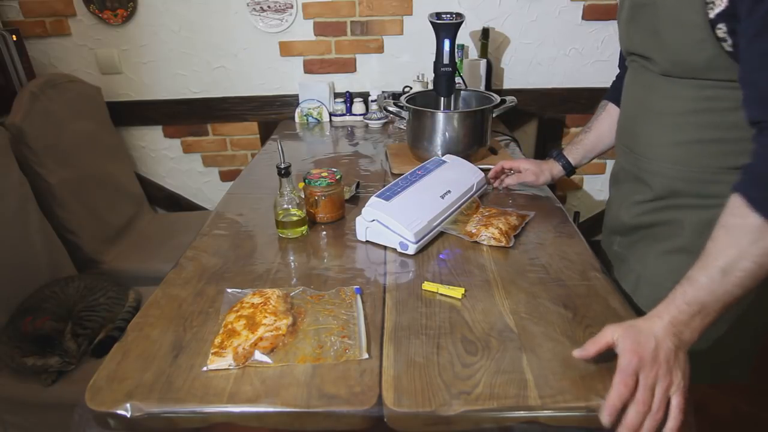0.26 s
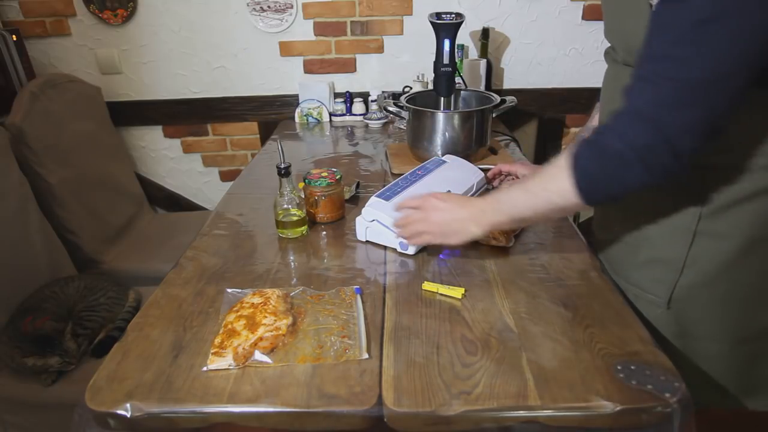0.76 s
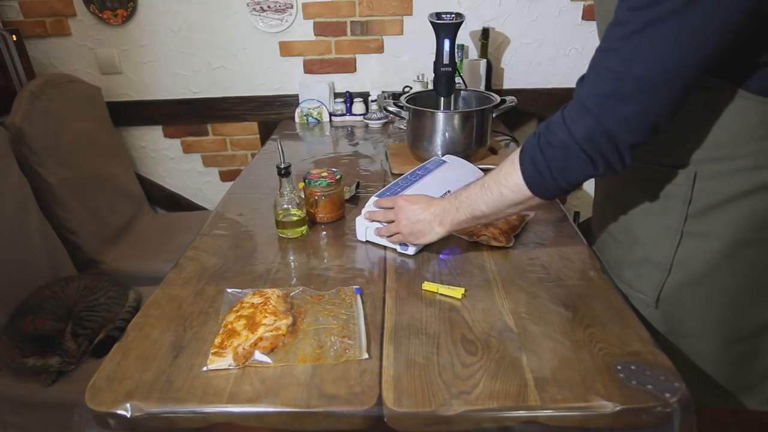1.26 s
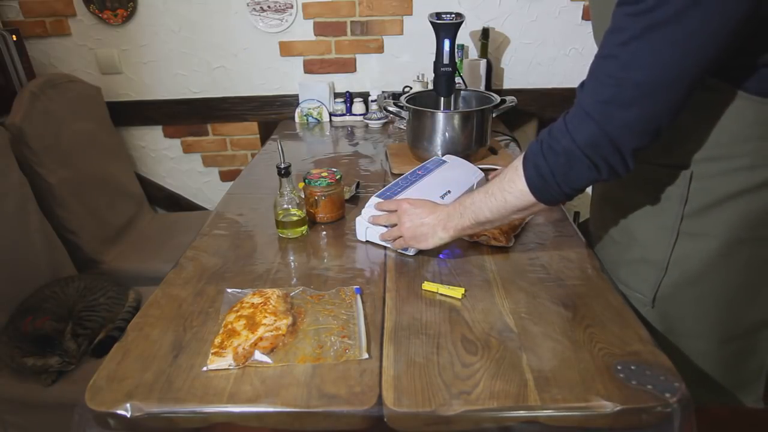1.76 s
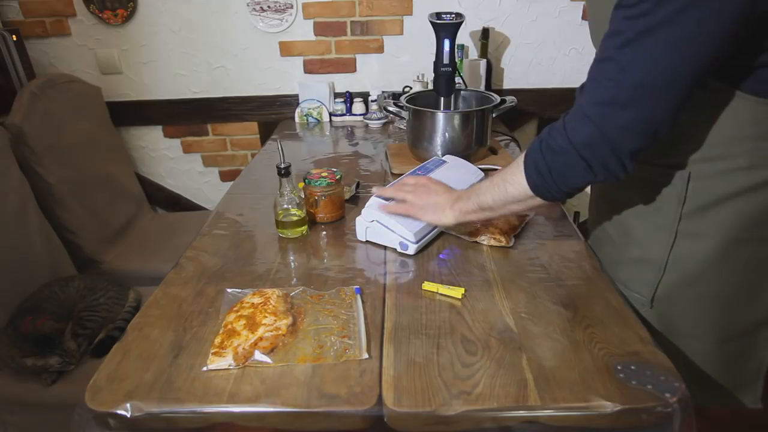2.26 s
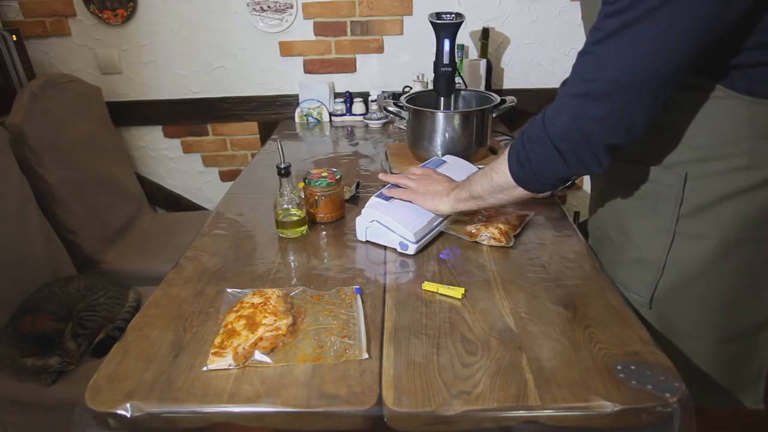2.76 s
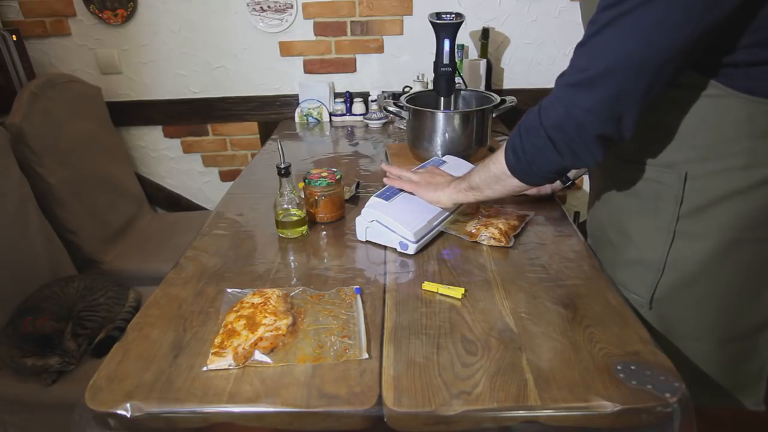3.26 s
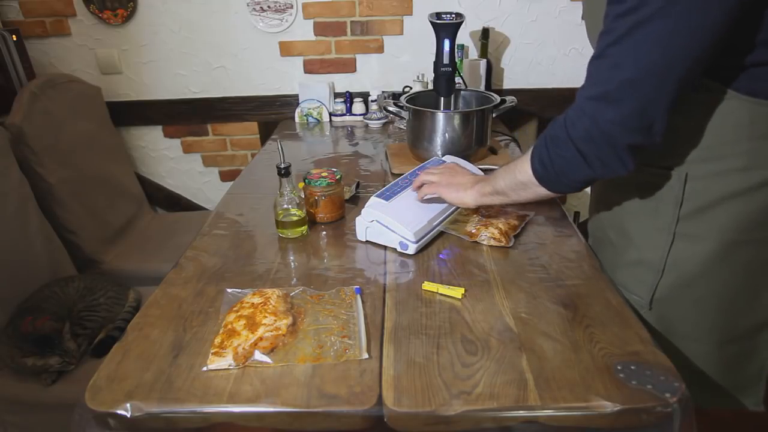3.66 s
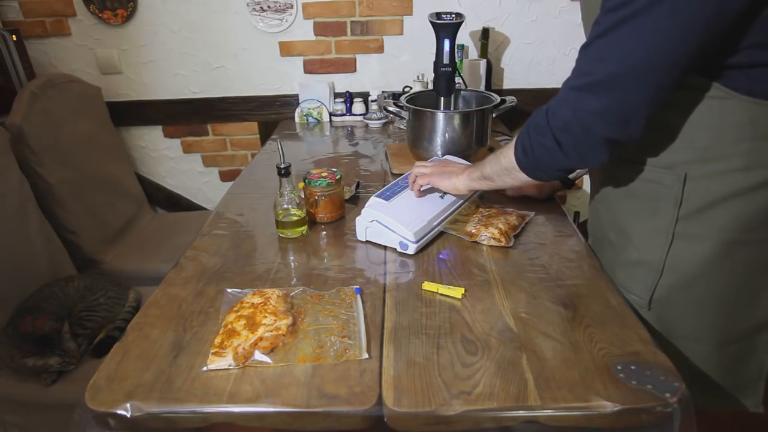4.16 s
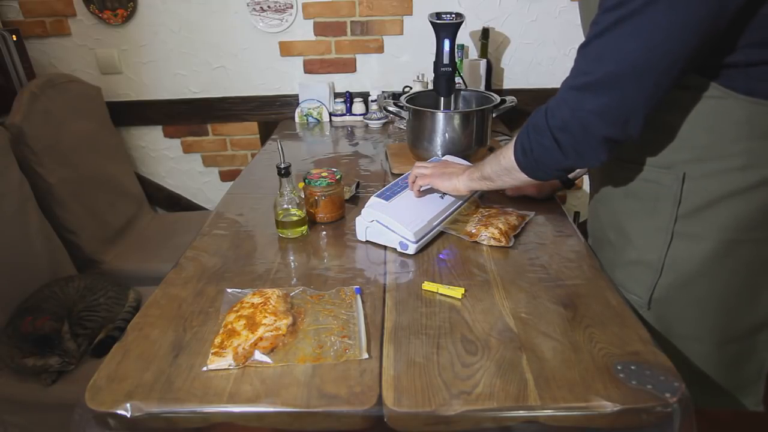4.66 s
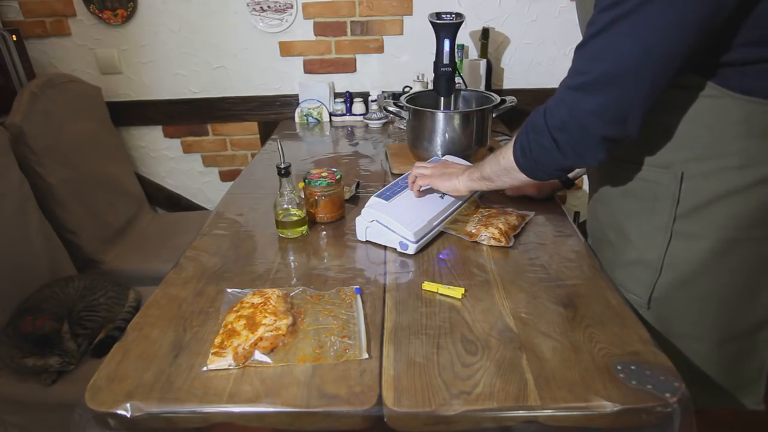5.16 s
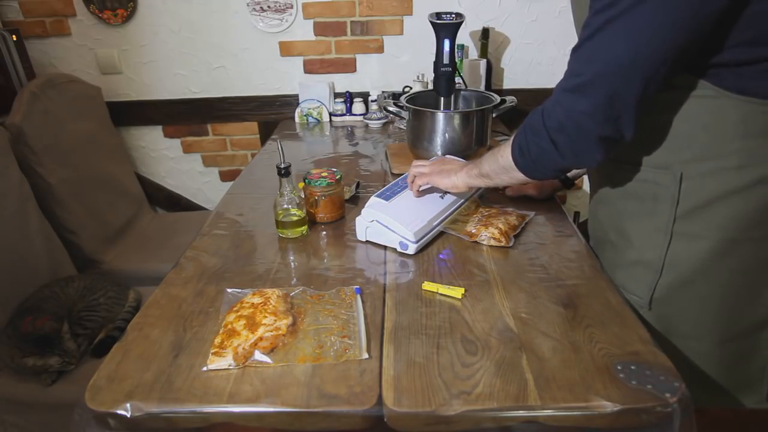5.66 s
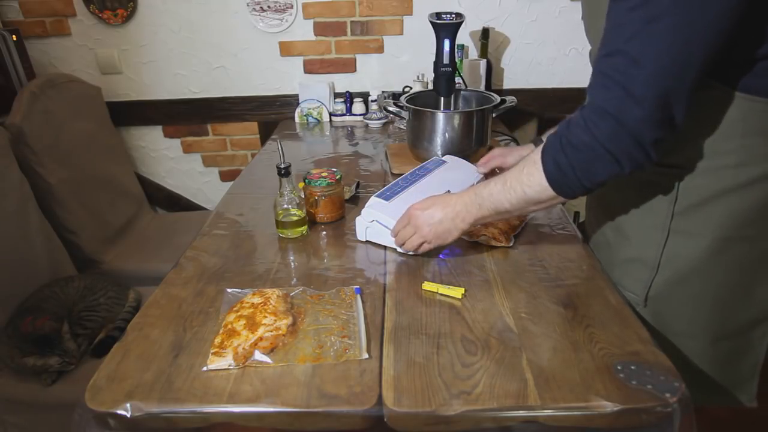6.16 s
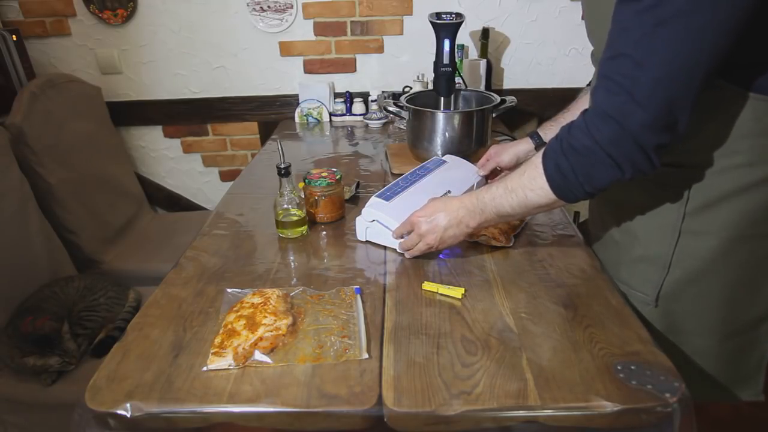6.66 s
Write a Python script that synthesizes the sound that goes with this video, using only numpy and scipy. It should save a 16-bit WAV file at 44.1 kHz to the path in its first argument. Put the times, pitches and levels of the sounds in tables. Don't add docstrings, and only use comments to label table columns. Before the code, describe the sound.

Harsh motor drone of a countertop bag sealer, a hard lid snap at three seconds, abrupt stop, then loud plastic unlatching clacks in a kitchen.

```python
import sys
import numpy as np
from scipy import signal
from scipy.fft import rfft, irfft
from scipy.io import wavfile
from scipy.ndimage import uniform_filter1d, minimum_filter1d

SR = 44100
rng = np.random.default_rng(int(sys.argv[2]) if len(sys.argv) > 2 else 0)


def dump_mix(stems):
    frames = np.atleast_2d(stems).T
    limited = np.clip(frames, -1, 1)
    pcm = np.round(limited * 32767).astype(np.int16)
    wavfile.write(sys.argv[1], SR, pcm)


def linear_from_db(decibels):
    return 10 ** (np.asarray(decibels, float) / 20)


N = 303849

STOP_S, COAST_S = 5.331, .024
BACKGROUND_DB, RISE_DB_PER_S = -40, 4
LIMIT_DB, ATTACK_S, HOLD_S, RELEASE_DB_PER_S = -2.5, 0.0061, 0.082, 19.5
FADE_S, FADE_DB_PER_S = 6.77, 42
LID_LAG = 0.1269
TABLE_NULL_HZ, TABLE_NULL_WIDTH_HZ, TABLE_NULL_SHARE = 412, 24, .8
CLAMP_AT, CLAMP_DB = .44, .9

# [f/Hz, level/dB]
ROOM_TONE = [(20, -52), (45, -40), (70, -29), (95, -13.5), (200, -3), (450, -8), (620, -10.5), (1100, -15),
             (2500, -20.5), (6400, -25.5), (8000, -33.5), (10800, -44.5), (16000, -49)]
# [f/Hz, width/Hz, level/dB]
CIRCULATOR = [(159, 37, -11.5), (220.2, 21, -11), (289, 8.4, -12), (346.6, 12.6, -10.5), (443.7, 30, -6),
              (699, 15, -16), (990, 18, -20)]
# [f/Hz, level/dB]
TONES = [
    (100, -14),
    (441.4, -10),
]
# [f/Hz, t60/s]
KITCHEN = [(100, 0.15), (1000, 0.43), (4000, 0.32), (12000, 0.15)]
# [t/s, stroke rate/Hz]
SPEED = [(0, 47.49), (.3, 47.22), (.55, 47.18), (1.05, 46.84), (1.3, 46.69), (1.72, 46.26), (2.08, 45.85),
         (2.35, 45.59), (2.65, 45.37), (2.85, 45.09), (3.15, 45.1), (3.45, 45.39), (3.8, 45.58),
         (4.25, 45.69), (4.6, 45.66), (5.33, 45.59)]
# [t/s, state, buzz of the top panel/dB]; states 0 resting, 1 loose, 2 drawn in,
# 3 sucked down, 4 held at a corner, 5 slipping, 6 pressed by hand, 7 settling, 8 latched
SEATING = [(0, 0.5, 3.5), (.35, 0.26, 0.5), (.65, 1, 2), (.92, 2.05, .5), (1.08, 2, 0.5), (1.3, 2.5, 1),
           (1.6, 3, 0.5), (2.1, 3, -5.5), (2.3, 3.5, -3), (2.52, 4, -2.5), (2.64, 4.5, -4.5),
           (2.76, 4.5, -13), (2.86, 5.5, -3), (3.1, 6.5, 3.5), (3.16, 6.5, 3), (3.4, 6.5, 4.5),
           (3.65, 7, 6.5), (3.95, 7.5, 4), (4.5, 7.5, 2), (5.3, 9.5, 3.5)]
# [f/Hz, width/Hz, level/dB]
RESTING = [(141, 43, -18), (338, 25, -6.5), (509, 20, -3), (640, 23, -14), (697, 18, -5.5), (800, 13, -7.5),
           (990, 42, -15), (1370, 110, -17.5), (1520, 60, -14.5), (1810, 49, -16), (1960, 26, -11),
           (2120, 97, -20), (2420, 60, -19), (2700, 120, -28)]
LOOSE = [(140, 25, -17.5), (349, 34, -7), (521, 19, -7.5), (711, 33, -7), (785, 44, -6), (987, 14, -13.5),
         (1083, 10, -10), (1225, 13, -10.5), (1630, 80, -19), (1940, 42, -12), (2010, 18, -12),
         (2072, 18, -12), (2470, 130, -21), (2700, 100, -20)]
DRAWN = [(151, 37, -12), (341.5, 26, -5), (580, 29, -11), (660, 49, -18), (752, 48, -10.5),
         (940, 78, -12.5), (1080, 68, -14), (1217, 18, -11), (1286, 16, -5.5), (1600, 44, -18),
         (1730, 22, -14), (1892, 25, -8.5), (1965, 18, -10), (2400, 300, -20.5)]
SUCKED = [(170.7, 17, -4), (316, 16.5, 1.5), (331, 58, -5), (495, 19, -5.5), (573, 170, -10.5),
          (693, 280, -12), (820, 46, -7), (980, 47, -40), (1120, 25, -11.5), (1223, 20, -9), (1330, 19, -9),
          (1740, 100, -21), (1920, 24, -5), (2100, 460, -20)]
HELD = [(158.4, 18.5, -6.5), (356, 19, -3), (517, 13, -8), (692, 9.4, -3), (872, 15, -12.5), (987, 19, -12),
        (1080, 24, -15), (1270, 67, -16), (1565, 26, -16), (1698, 22, -10), (1887, 30, -4),
        (2050, 199, -15), (2280, 39, -10.5), (2680, 282, -20)]
SLIPPING = [(172, 24, -8.5), (349, 18, -2.5), (502, 25, -15), (575, 35, -6.5), (660, 60, -19),
            (810, 34, -10), (940, 69, -20), (1280, 45, -12), (1343, 41, -19), (1650, 64, -18),
            (1870, 40, -14), (1910, 58, -8.5), (2084, 20, -5), (2330, 200, -16)]
PRESSED = [(200, 30, -0.5), (340, 40, -4.5), (450, 14, -10), (607, 53, -2), (822, 14, -8), (900, 16, -19),
           (1085, 24, -11), (1172, 14, -10), (1308, 34, -8), (1597, 18, -4.5), (1740, 40, -5),
           (1900, 48, -1), (2075, 12, -0.5), (2380, 65, -13), (2570, 34, -19)]
SETTLING = [(191, 25, -8), (331, 22, -9), (528, 41, -11), (688, 21, -8), (910, 36, -11.5),
            (1152, 42, -10.5), (1244, 50, -11), (1365, 23, -12), (1600, 57, -17), (1688, 7.4, -8),
            (1826, 27, -16), (1910, 21, -8.5), (1950, 70, -11.5), (2092, 21, -8.5), (2260, 130, -17.5),
            (2550, 47, -20), (2750, 130, -19.5)]
LATCHED = [(190, 19, -6.5), (338, 25, -4.5), (560, 79, -5), (685, 27, -8), (808, 51, -7), (1141, 18, -14),
           (1232, 21, -14.5), (1324, 14, -6.5), (1574, 33, -5), (1690, 16, -17), (1902, 71, -4),
           (2035, 200, -14.5), (2388, 45, -7), (2560, 81, -14.5), (2630, 190, -13.5)]
SMEAR = [0.62, 0.94, 1, 1, 0.57, 0.63, 0.53, 0.57, 0.47]
BASE_LAG = [0, 0, 0, 0, 0, 0, .02, .08, .11]
FIRST_STRIKE = [0, 0, 0, 0, .3, .3, .9, .8, .4]
# [case hum/dB, air re hum/dB, valve knock/dB, valve rattle/dB]
LEVELS = [
    (-26.5, -20, -28.5, -23.5),
    (-25, -11, -30, -24),
    (-26, -14, -29, -23.5),
    (-23.5, -16, -29, -24.5),
    (-20, -23, -29.5, -27),
    (-21.5, -13, -30, -27),
    (-19.5, -17, -30, -28),
    (-24, -20, -35, -32),
    (-21.5, -53, -31, -31.5),
]
# [f/Hz, level/dB]
AIR = [(41, -51), (70, -55), (135, 4), (268, -14), (326, -12), (607, 0), (727, -8), (1450, -1), (1910, 1),
       (3500, -8.5), (4550, -28), (7700, -120)]
# [t/s, lead/strokes]
VALVE_LEAD = [
    (0, 0.072),
    (2.1, 0.084),
    (3.6, 0.00072),
]
# [f/Hz, level/dB]
KNOCK = [(1590, -5.5), (2700, 1.5), (3010, -4), (3310, -3), (3760, -7), (4880, -4), (5630, -20),
         (5920, -3.5), (6800, -10), (8840, -52), (15000, -120)]
# [f/Hz, level/dB]
RATTLE = [(3060, -76), (5200, -31), (5450, 1.5), (5900, -8.5), (6930, -3), (7330, 0.5), (7650, 2.5),
          (9010, -8.5), (10300, -18.5), (12300, -18), (13700, -27), (15100, -26), (16000, -45)]
# [f/Hz, width/Hz, level/dB]
FLAP = [(3440, 156, 4), (4085, 37, 12.5), (5070, 600, 3), (5500, 210, 4)]
# [f/Hz, width/Hz, level/dB]
REED = [(6800, 34, -35.5), (6720, 47, 7.5), (7376, 35, 7.5), (7620, 82, 12), (8300, 180, -1), (7820, 26, 3),
        (8854, 240, 2), (9950, 32, -2), (11120, 210, -24), (13100, 250, -25)]
# [t/s, peak level/dB, tilt/(dB # per octave), t60/s, prominent f/Hz]
CLICKS = [(.27, -10.5, 2.5, 0.046, 1270), (1.16, -11, 1, 0.008, 3420), (2.2178, -5.5, -1, 0.07, 5500),
          (2.893, -9, -0.5, 0.058, 1600), (3.111, 6.5, 3, 0.02, 4240), (3.1126, 0, -1, 0.056, 2400),
          (3.3082, -13, -3, 0.044, 1200), (5.328, -2, -2.5, 0.0083, 2660), (5.546, -28.5, -3, .06, 4500),
          (5.627, -24, 0, 0.017, 4000), (5.6404, -11.5, -1.5, 0.018, 3440), (5.646, -17, -4, 0.21, 630),
          (5.66, -26, -3.5, 0.13, 1650), (6.068, -27, 1, .03, 6000), (6.229, -33, -1, 0.022, 2700),
          (6.35, -15, -2, 0.041, 2700), (6.4458, -15.5, -1.5, 0.041, 2700), (6.517, -16, -1.5, 0.041, 2700),
          (6.5672, -16, -1.5, 0.04, 1940), (6.6179, -3.5, -1.5, 0.036, 6330),
          (6.6585, 6.5, 0.5, 0.014, 1740), (6.6613, 6, -2, 0.02, 620), (6.6651, 8.5, -0.5, 0.022, 6160),
          (6.674, -5, -6, 0.063, 200), (6.7108, -14, -8, 0.023, 1700)]
# [f/Hz, width/Hz, level/dB]
LID = [(167, 92, -7.5), (330, 93, -4), (590, 490, -1.5), (1153, 130, 4), (1650, 250, 1.5), (2570, 220, 2),
       (4000, 2500, 4.5), (5670, 1050, 8.5), (6900, 1600, 7), (8600, 3600, -3), (13000, 6000, -21)]


def rms_one(x):
    return x / np.sqrt(np.mean(x ** 2) + 1e-20)


def in_time(rows):
    s, *columns = np.transpose(rows)
    return [np.interp(np.arange(N) / SR, s, c) for c in columns]


def coloured(x, spectrum):
    hz = np.fft.rfftfreq(len(x), 1 / SR) + 1
    point_hz, point_db = np.transpose(spectrum)
    return irfft(rfft(x) * linear_from_db(np.interp(np.log(hz), np.log(point_hz), point_db)), len(x))


def drift(rate, count):
    r = np.exp(-512 * np.pi * rate / SR)
    slow = signal.lfilter([1], [1, -2 * r, r * r], rng.standard_normal((count, N // 256 + 402)))[:, 400:]
    return slow / slow.std(axis=1, keepdims=True)


def full_rate(slow):
    return np.interp(np.arange(N) / 256, np.arange(len(slow)), slow)


def resonance(x, hz, width_hz):
    r = np.exp(-np.pi * width_hz / SR)
    return signal.lfilter([(1 - r * r) / 2, 0, (r * r - 1) / 2], [1, -2 * r * np.cos(2 * np.pi * hz / SR), r * r], x)


def ring(x, modes):
    return rms_one(sum(linear_from_db(db) * resonance(x, hz, width) * (-1) ** k for k, (hz, width, db) in enumerate(modes)))


def burst(t60):
    return rng.standard_normal(SR // 8) * linear_from_db(-60 * np.arange(SR // 8) / SR / t60)


def background():
    t = np.arange(N) / SR
    tone = rms_one(coloured(rng.standard_normal(N), ROOM_TONE))
    hums = 0
    for hz, width, db in CIRCULATOR:
        once = resonance(rng.standard_normal(N), hz, width)
        hums = hums + linear_from_db(db) * rms_one(resonance(once, hz, width))
    for hz, db in TONES:
        hums = hums + linear_from_db(db) * np.sqrt(2) * np.sin(2 * np.pi * hz * t)
    unsteady = linear_from_db(0.85 * full_rate(drift(27, count=1)[0]))
    level = linear_from_db(BACKGROUND_DB + RISE_DB_PER_S * np.maximum(t - STOP_S, 0))
    return level * (tone * unsteady + linear_from_db(1.5) * hums)


def panels(modes, hz):
    response = 0
    for k, (centre_hz, width, db) in enumerate(modes):
        response = response + linear_from_db(db) * (-1) ** k / (1 + 2j * (hz - centre_hz) / width)
    level = abs(response)
    return level / np.sqrt(np.sum(level ** 2, axis=0) / 2)


def stroke_phases(order):
    def delay(strokes):
        return np.exp(-2j * np.pi * strokes)

    blow = rng.standard_normal(256) * np.exp(-(np.arange(256) / 256 / np.array(SMEAR)[:, None]) ** 2)
    timing = rfft(blow)[:, order] * delay(LID_LAG * np.maximum(order - 21, 0))
    timing = timing * delay(np.outer(BASE_LAG, np.minimum(order, 21)))
    timing = timing / np.sqrt(np.mean(abs(timing) ** 2, axis=1, keepdims=True))
    strikes = delay(order * .41) + np.outer(FIRST_STRIKE, delay(order * .145))
    returning = linear_from_db(11.0) * strikes / (1 + 1j * (order - 42) / 0.78)
    return timing + returning * [[.1], [.1], [.1], [.1], [.3], [.3], [.6], [.7], [1]]


def case_hum(strokes):
    wander_db, wander_rad = 1.69, 0.15
    order = np.arange(1, 63)
    column = order[:, None]
    hz = column * in_time(SPEED)[0][::256]
    seating, panel_db = np.array(in_time(SEATING))[:, ::256]
    last = len(SMEAR) - 1
    shares = np.clip(1 - abs(np.clip(seating, 0, last) - np.arange(last + 1)[:, None]), 0, 1)

    timing = stroke_phases(order)
    blend = (timing / abs(timing)).T @ shares + 1e-9
    states = [RESTING, LOOSE, DRAWN, SUCKED, HELD, SLIPPING, PRESSED, SETTLING, LATCHED]
    levels = sum(share * panels(modes, hz) for share, modes in zip(shares, states))
    levels = levels / (1 + (75 / hz) ** 4)
    levels = levels * (1 - TABLE_NULL_SHARE / (1 + ((hz - TABLE_NULL_HZ) / TABLE_NULL_WIDTH_HZ) ** 2))
    levels = levels * linear_from_db(panel_db * np.clip((column - 30) / 10, 0, 1))
    lines = levels * blend / abs(blend)

    play = (1 + column / 9) * (1 - 0.099 * seating)
    level_db = drift(0.68, count=len(order))[:, :len(seating)]
    angle = drift(4.4, count=len(order))[:, :len(seating)]
    slow = lines * linear_from_db(wander_db * level_db) * np.exp(1j * wander_rad * play * angle)
    turn, rotor, out = np.exp(2j * np.pi * strokes), 1, 0
    for line in slow:
        rotor = rotor * turn
        out = out + (full_rate(line) * rotor).real
    return out


def air_rumble():
    return rms_one(coloured(rng.standard_normal(N), AIR))


def valve(strokes, running, knock_db, rattle_db):
    seating = in_time(SEATING)[0]
    strokes = strokes + in_time(VALVE_LEAD)[0]
    at = np.append(0, np.flatnonzero((np.diff(np.floor(strokes)) > 0) & running[1:]))
    chance = rng.standard_normal((len(at), 3))

    slaps = np.zeros(N)
    slaps[at + np.round(1.2 * chance[:, 0]).astype(int) + 8] = linear_from_db(0.67 * chance[:, 1])
    soft_start = np.clip(np.arange(SR // 8) / SR / 0.0022, 0, 1)
    same = rms_one(signal.fftconvolve(slaps, burst(0.057) * soft_start)[:N])

    strength = np.zeros(N)
    strength[at + np.round(12 * abs(chance[:, 0])).astype(int)] = linear_from_db(0.89 * chance[:, 2])
    t = np.arange(2000) / SR
    bounce = np.clip(t / 0.0038, 0, 1) * np.exp(-t / 0.0039) * (1 + 0.53 * np.cos(2 * np.pi * 172 * (t - .002)))
    gate = rms_one(signal.fftconvolve(strength, bounce)[:N])
    fresh = rms_one(gate * rng.standard_normal(N) * linear_from_db(2.4 * rng.standard_normal(N)))
    puff = rms_one((gate + 0.96 * running) * rng.standard_normal(N))
    puff = puff * linear_from_db(-1.3 * seating)

    knock = rms_one(coloured(same + 0.97 * puff, KNOCK)) + linear_from_db(-5.5) * ring(puff + .5 * same, FLAP)
    tick = resonance(slaps, 5310, 230) + 0.67 * resonance(slaps, 3640, 280)
    knock = knock + linear_from_db(-17.5 + 0.97 * seating) * rms_one(tick)
    knock = knock / np.sqrt(uniform_filter1d(knock ** 2, size=SR // 4) + 0.061)

    rattle = rms_one(coloured(fresh + 0.32 * same, RATTLE))
    rattle = rms_one(rattle + linear_from_db(2.0) * ring(fresh, REED))
    clamped = running * np.clip((strokes % 1 - CLAMP_AT) / 0.13, 0, 1)
    rattle = rattle * linear_from_db(-CLAMP_DB * seating * clamped)
    return linear_from_db(knock_db - 2.0) * knock + linear_from_db(rattle_db - 2.0) * rattle


def catches():
    out = np.zeros((2, N + SR))
    for s, peak_db, tilt_db, t60, spot_hz in CLICKS:
        contact = burst(max(t60, .004))
        contact[0] = 5.7
        snap = linear_from_db(-17 + .5 * tilt_db) * contact
        for k, (hz, width, db) in enumerate(LID):
            spot_db = 5.6 * np.exp(-(np.log2(hz / spot_hz) / 0.31) ** 2)
            gain = linear_from_db(db + tilt_db * np.log2(hz / 1500) + spot_db) * np.sqrt(300 / width) * (-1) ** k
            snap = snap + gain * resonance(contact, hz, width)
        soft_hz = np.clip(14000 * 2 ** (tilt_db / 0.99), 2000, 18000)
        snap = signal.sosfilt(signal.butter(2, [170, soft_hz], "band", fs=SR, output="sos"), snap)
        crack = snap * np.exp(-np.arange(len(snap)) / SR / 0.0009)
        start = round(s * SR)
        out[:, start:start + len(snap)] += linear_from_db(peak_db - 3.5) * np.array([snap, crack]) / abs(snap).max()
    return out[:, :N]


def kitchen(x):
    t, tail = np.arange(SR // 2) / SR, 0
    point_hz, point_t60 = np.transpose(KITCHEN)
    for low in 62.5 * 2 ** np.arange(8):
        octave = signal.butter(2, [low, 2 * low], "band", fs=SR, output="sos")
        band = signal.sosfilt(octave, rng.standard_normal(len(t)))
        t60 = np.interp(np.log(low * np.sqrt(2)), np.log(point_hz), point_t60)
        tail = tail + band * linear_from_db(-60 * t / t60) * np.clip(t / 0.011, 0, 1)
    return signal.fftconvolve(x, tail / np.sqrt(np.sum(tail ** 2)))[:N]


def scene():
    seating, after_stop = in_time(SEATING)[0], np.arange(N) / SR - STOP_S
    hum_db, air_db, knock_db, rattle_db = [np.interp(seating, np.arange(len(LEVELS)), column)
                                           for column in np.transpose(LEVELS)]
    strokes = .39 + np.cumsum(in_time(SPEED)[0]) / SR
    running = np.arange(N) < STOP_S * SR

    body = linear_from_db(hum_db) * (case_hum(strokes) + linear_from_db(air_db) * air_rumble())
    body = body * np.exp(-np.maximum(after_stop, 0) / COAST_S)
    slap = valve(strokes, running, knock_db, rattle_db)
    snaps, cracks = catches()
    last_strokes = (body + 2.3 * slap) * np.exp(-abs(after_stop) / .03)
    ringing_on = linear_from_db(-6.5) * kitchen(last_strokes) * uniform_filter1d(1. - running, size=600)
    room = kitchen(linear_from_db(-6.5) * slap + linear_from_db(-16.0) * snaps + linear_from_db(2.5) * cracks)
    return (body + ringing_on + slap + snaps + room + background())[None]


def gain_control(x):
    t, hold = np.arange(N) / SR, round(HOLD_S * SR)
    over_db = np.maximum(20 * np.log10(abs(x[0]) + 1e-9) - LIMIT_DB, 0)
    held_db = -minimum_filter1d(-over_db, 2 * hold + 1, origin=hold)
    held_db = np.maximum.accumulate(held_db + RELEASE_DB_PER_S * t) - RELEASE_DB_PER_S * t
    r = np.exp(-1 / (ATTACK_S * SR))
    cut_db = signal.lfilter([1 - r], [1, -r], held_db)
    return x * linear_from_db(-cut_db - FADE_DB_PER_S * np.maximum(t - FADE_S, 0))


def band_limit(x):
    return signal.sosfilt(signal.butter(12, 15950, fs=SR, output="sos"), x)


def record(dry):
    thin = signal.sosfilt(signal.butter(1, 50, "high", fs=SR, output="sos"), dry)
    return band_limit(np.clip(gain_control(thin), -1, 1))


dry = scene()
out = record(dry)
dump_mix(out)
```